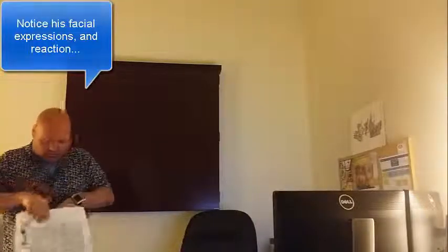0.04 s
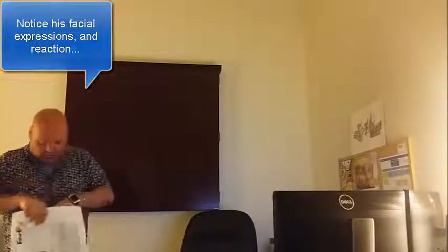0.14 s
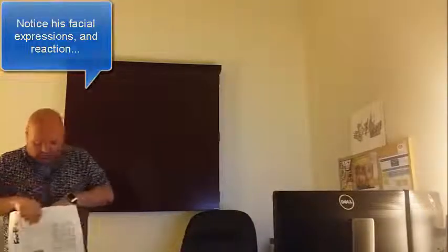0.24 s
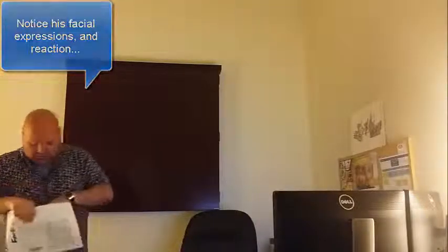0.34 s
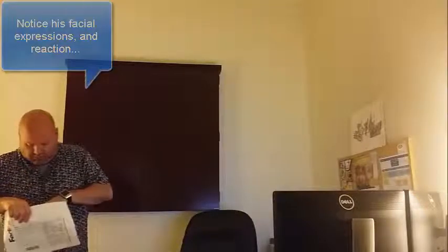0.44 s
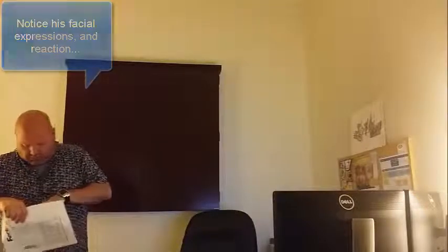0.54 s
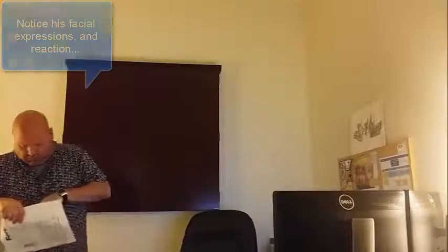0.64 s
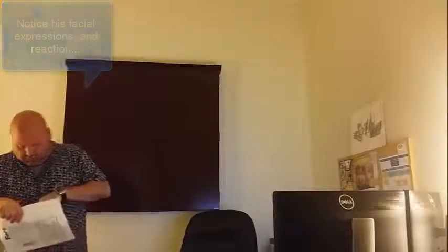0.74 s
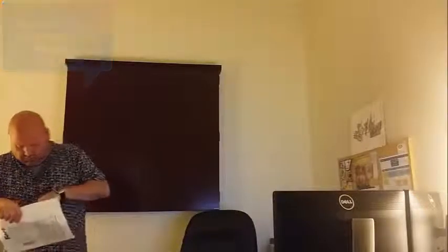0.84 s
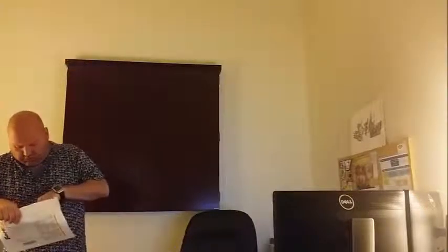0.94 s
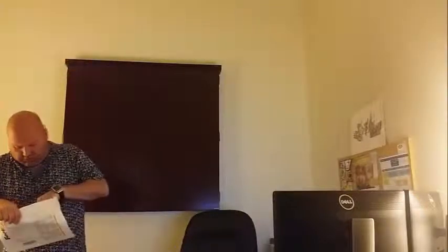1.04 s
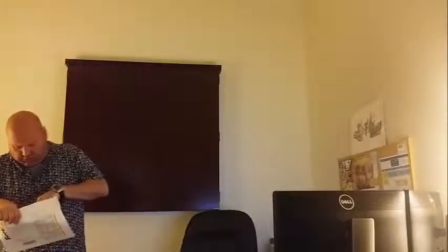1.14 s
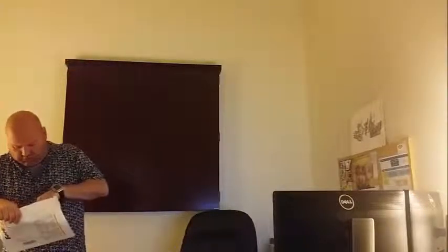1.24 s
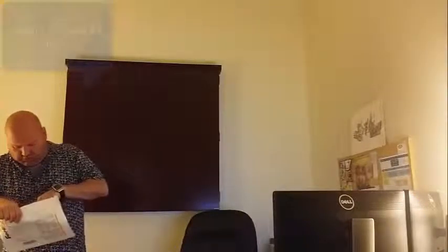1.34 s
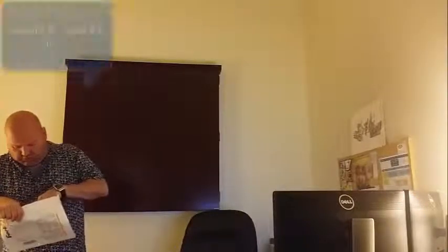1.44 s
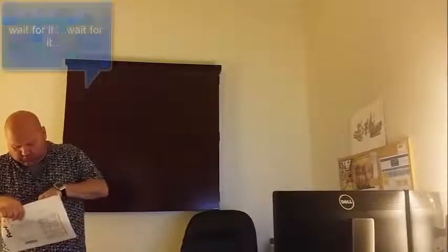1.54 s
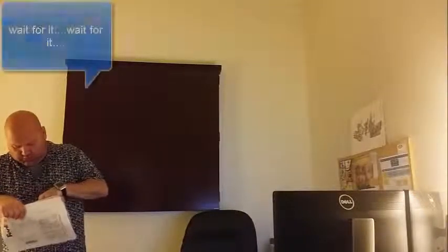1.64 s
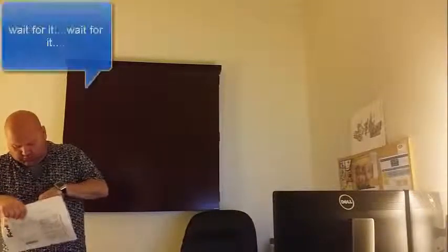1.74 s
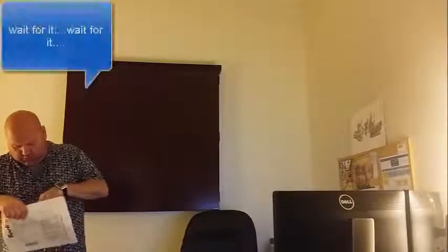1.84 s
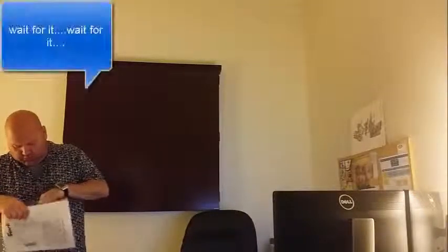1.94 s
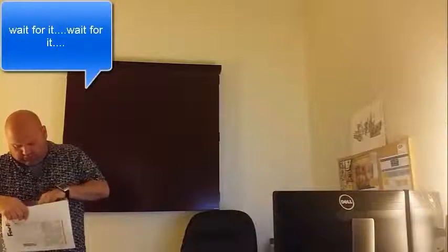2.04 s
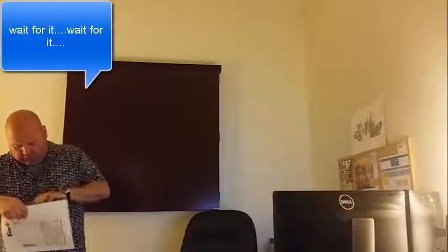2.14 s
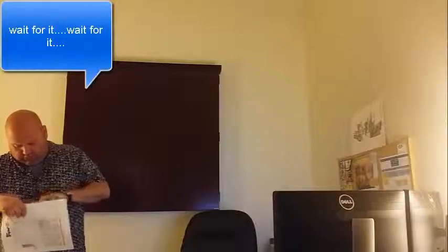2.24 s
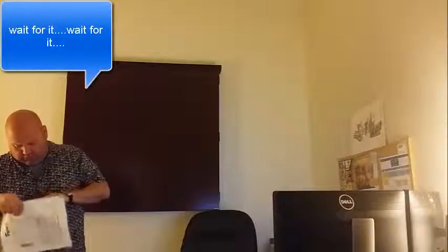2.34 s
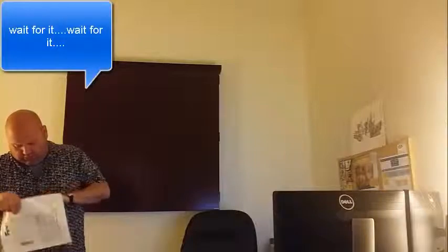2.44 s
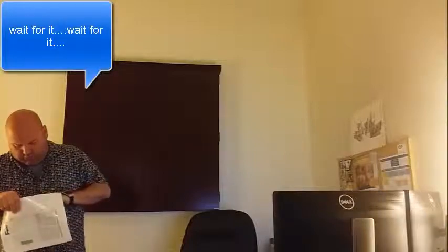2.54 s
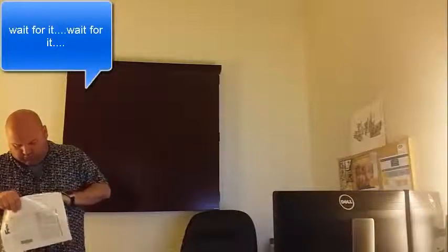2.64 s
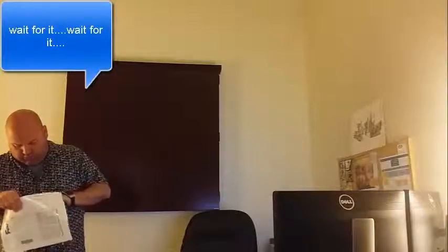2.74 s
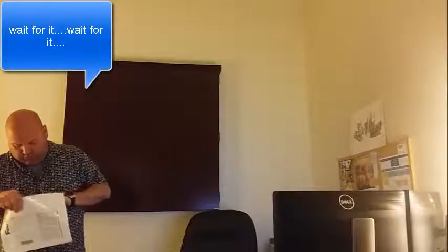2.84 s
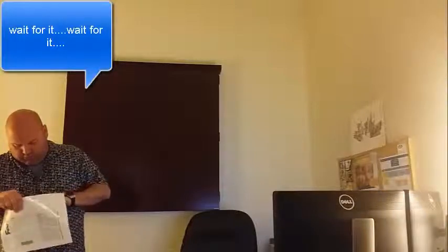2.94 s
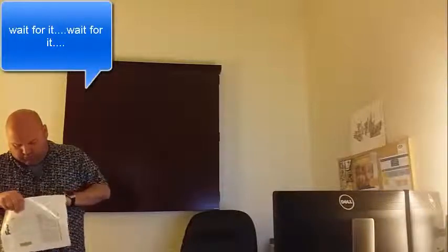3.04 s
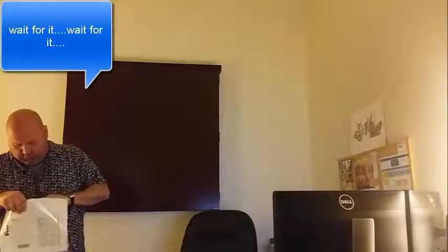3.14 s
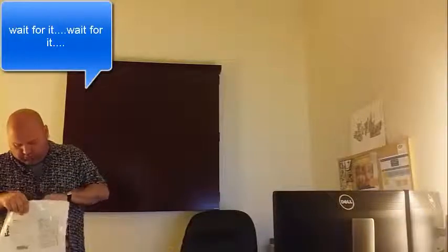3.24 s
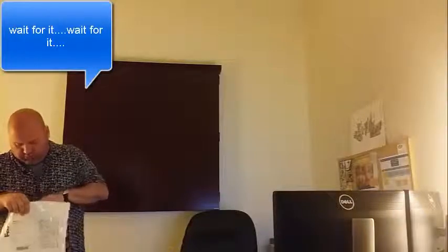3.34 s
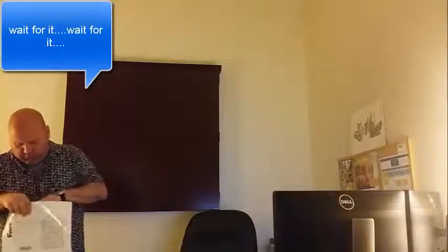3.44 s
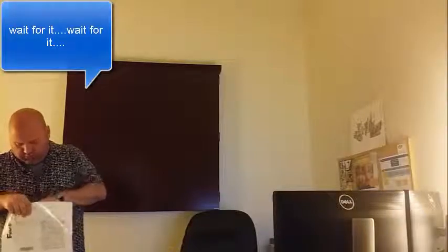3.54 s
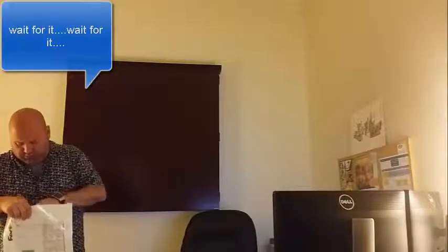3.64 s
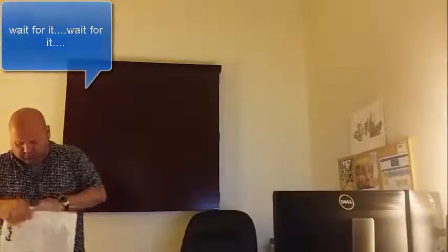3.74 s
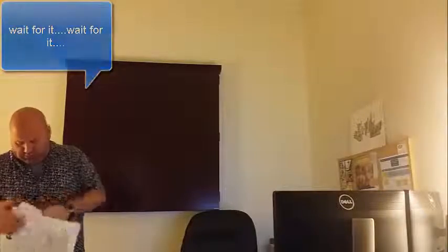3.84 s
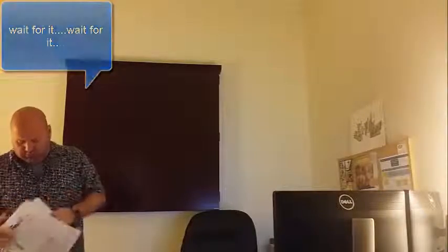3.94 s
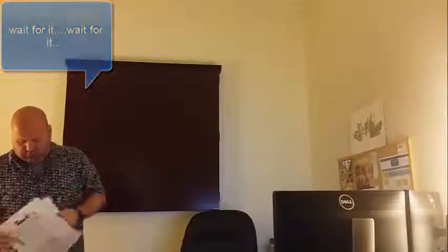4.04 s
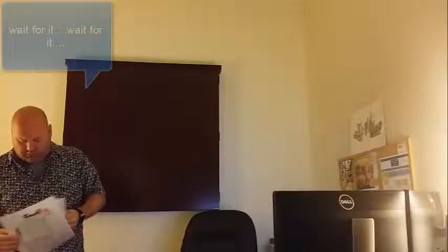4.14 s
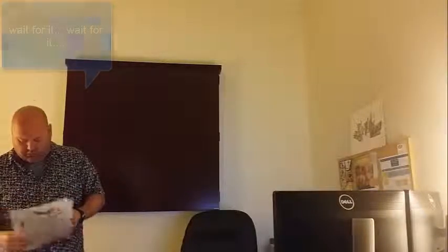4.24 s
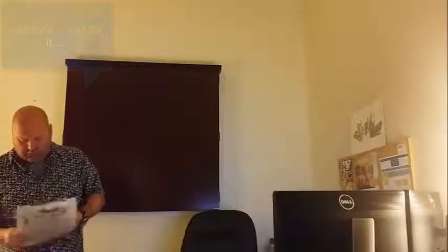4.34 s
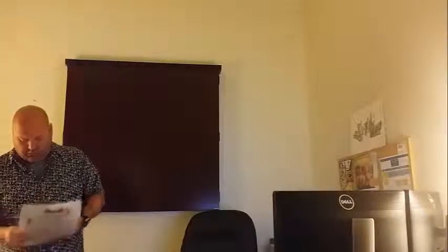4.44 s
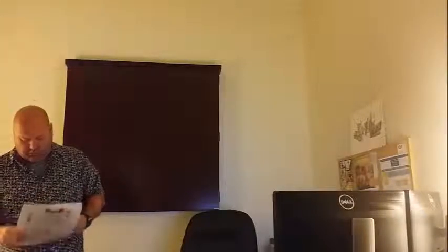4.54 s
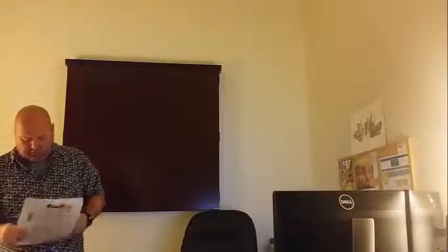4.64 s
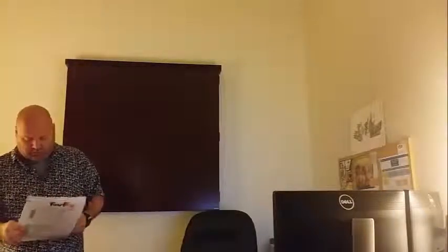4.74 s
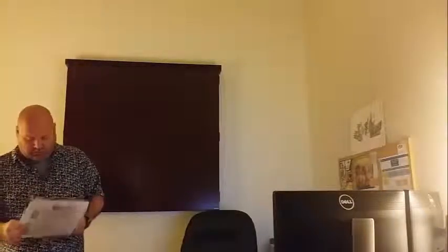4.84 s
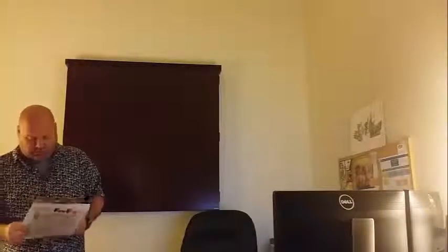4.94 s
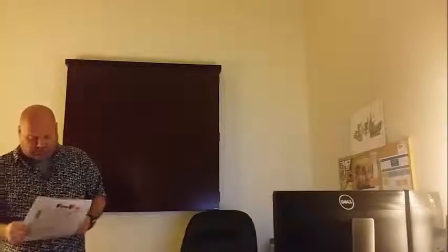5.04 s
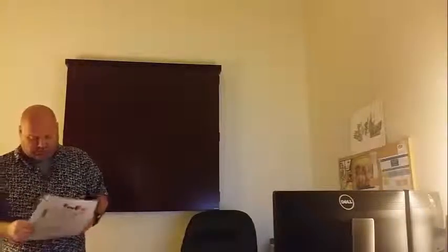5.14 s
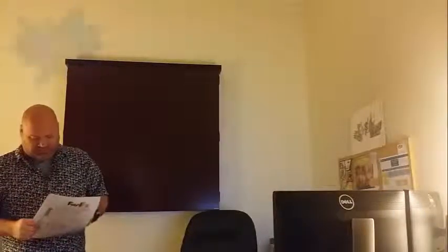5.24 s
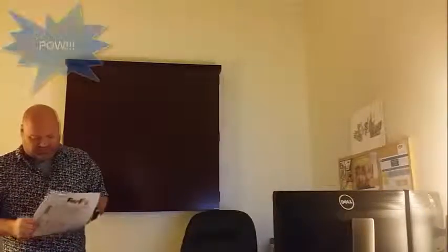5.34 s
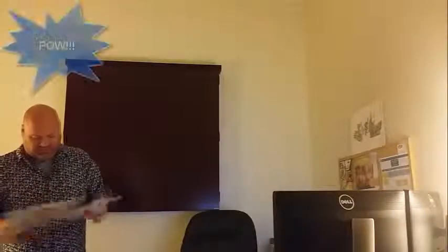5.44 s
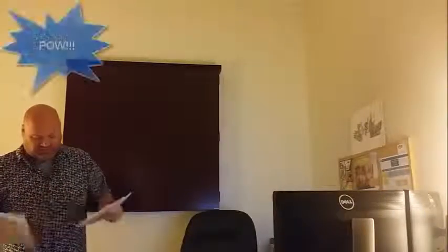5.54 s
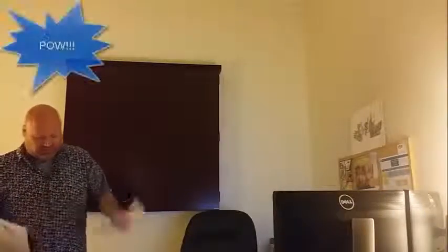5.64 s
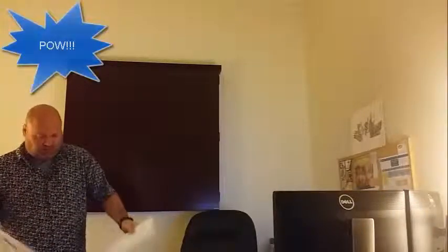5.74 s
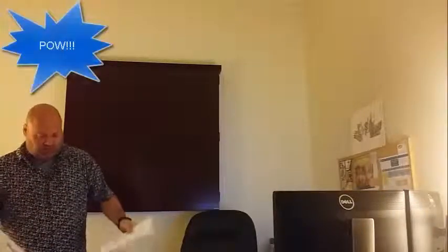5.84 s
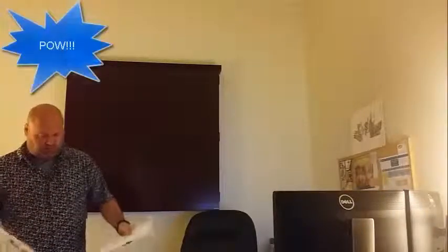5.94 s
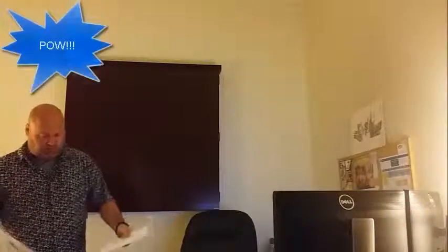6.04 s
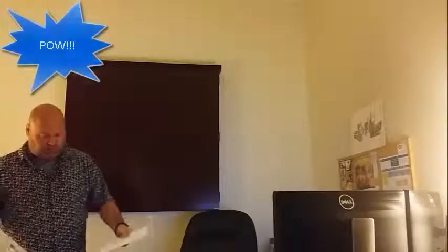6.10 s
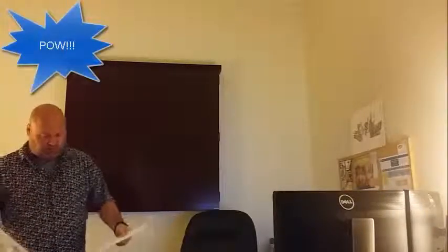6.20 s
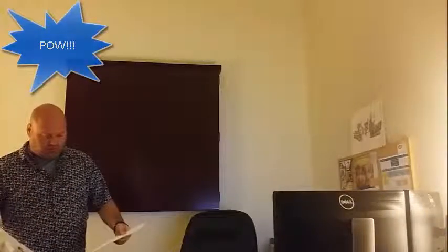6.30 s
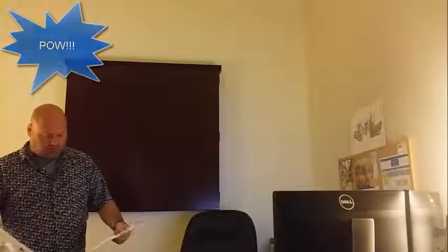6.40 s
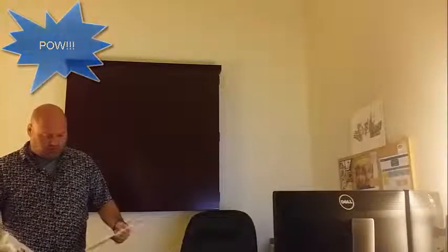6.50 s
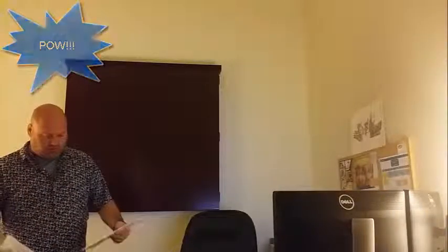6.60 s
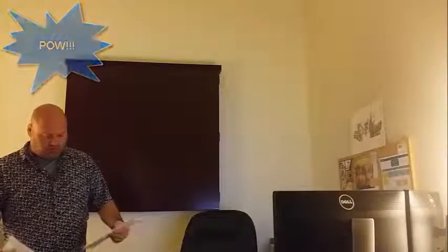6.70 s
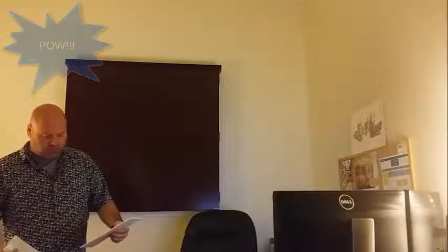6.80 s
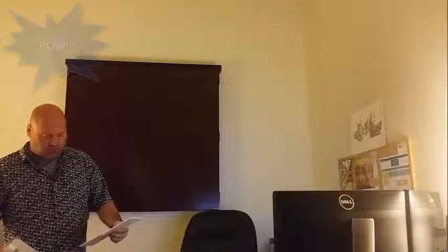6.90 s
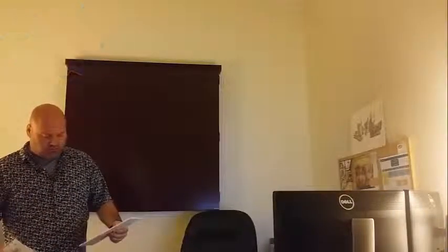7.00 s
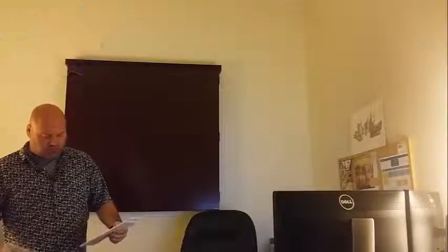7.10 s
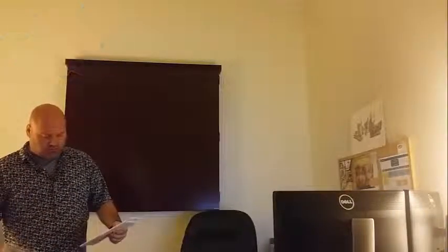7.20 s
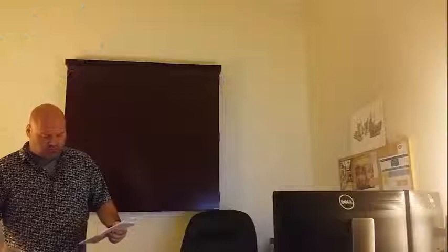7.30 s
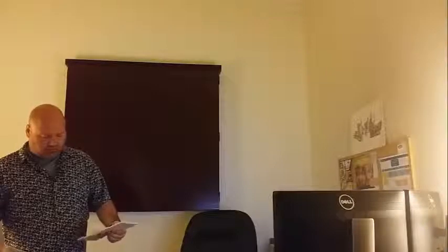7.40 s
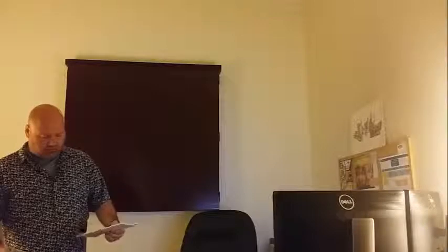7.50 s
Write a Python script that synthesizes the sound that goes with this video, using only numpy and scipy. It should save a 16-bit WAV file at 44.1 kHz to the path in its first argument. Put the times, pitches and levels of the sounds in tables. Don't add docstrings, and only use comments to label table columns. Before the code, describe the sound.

A small office with steady, low air-conditioning hum and faint hiss, heard by stereo microphones a few steps from the handling. At 0 to 0.3 s a stiff card envelope flaps and knocks, then fades to faint rustles, with a light tick near 0.8 and a soft thump near 1.0. A short burst of bending and scraping comes at 2.0 to 2.5. From 3.1 the envelope is worked open: crinkles, snaps and dry scrapes, densest from 3.8 to 4.7, with a sharp tick at 4.75 and a brighter crack at 4.8. More rustling leads to 5.5, when a popper explodes: hard overloaded crack, low boom, bright room and panel ringing fading over about half a second. The shell ticks twice around 5.85. The hum is ducked very low, then swells back from about 6.2 to 7.5, with barely audible paper movement.

```python
import sys
import numpy as np
from scipy import signal
from scipy.fft import rfft, irfft, next_fast_len
from scipy.io import wavfile
from scipy.ndimage import uniform_filter1d, map_coordinates

SR = 44100
rng = np.random.default_rng(int(sys.argv[2]) if len(sys.argv) > 2 else 0)


def makeup_ratio(level_db):
    decades = np.asarray(level_db, float) / 20
    return 10 ** decades


def wav_record(signal):
    frames = np.transpose(np.atleast_2d(signal))
    bounded = np.clip(frames, -1, 1)
    quanta = np.round(bounded * 32767).astype(np.int16)
    wavfile.write(sys.argv[1], SR, quanta)


N = 333528

# (frequency [Hz], density [dB per Hz])
AIR_SPECTRUM = [(15, -60.5), (25, -35), (41, -20), (76, -13), (99, -5.5), (153, -0.5), (236, -9),
                (384, -27), (695, -27.5), (887, -18.5), (1100, -17.5), (4610, -43.5), (11900, -48.5),
                (14400, -51), (16000, -86.5)]
# (frequency [Hz], correlation [-1..1])
AIR_LIKENESS = [(60, 0.78), (150, 1), (380, 0.79), (950, 0.15), (2380, 0.42), (5980, -0.0), (15000, 0.066)]
# (frequency [Hz], left over right [dB])
AIR_BALANCE = [(60, -1.5), (240, -4), (950, -2.0), (3770, -1.5), (15000, -1)]
# (frequency [Hz], t60 [s])
ROOM_T60 = [(60, .2), (200, 0.18), (700, .38), (2000, 0.46), (4450, 0.47), (9000, 0.47), (12000, 0.34),
            (15500, 0.33)]

# (time [s], hold
# [s], slide [dB], bend [dB], wave over bend [dB])
HAND_MOVES = [(0.036, 0.0089, -47, -43.5, -1), (0.06, .04, -58, -44, -4.5), (.11, 0.03, -72, -51, -1),
              (0.18, 0.083, -56.5, -57, -3.5), (0.29, 0.095, -64.5, -57, -5),
              (0.4, 0.37, -72.5, -61.5, -3.5), (0.465, .005, -62, -70, -5), (0.69, 0.0045, -66, -70, -5),
              (0.84, .005, -67, -68, -2), (1.024, 0.0072, -60, -60, 7), (1.3, 0.67, -77, -69, -3),
              (1.955, 0.025, -60, -55.5, 4.5), (1.99, .06, -54, -51, -4), (2.066, 0.013, -54, -45, -23),
              (2.385, 0.04, -54, -48, -7), (2.398, 0.01, -56.5, -40, -11.5),
              (2.462, 0.016, -67, -43.5, -5), (6.85, .5, -79, -80, -5), (7.524, 0.037, -66.5, -79.5, -5),
              (3.138, 0.083, -64.5, -63, -3), (3.24, 0.026, -69, -53, -2),
                 (3.324, 0.037, -64.5, -58, -11), (3.421, .005, -75, -48.5, -11),
                 (3.475, 0.033, -58, -55, -7), (3.513, 0.23, -58, -54.5, -6),
                 (3.774, 0.032, -45, -49.5, -9), (3.818, 0.059, -54.5, -45, -4),
                 (3.932, 0.08, -66, -65, 4.5), (4.062, 0.14, -62.5, -60.5, -12),
                 (4.243, 0.033, -56.5, -52, -13), (4.304, .005, -54, -42, -20),
                 (4.344, 0.081, -53.5, -54.5, -10), (4.45, 0.013, -48, -54, -5),
                 (4.469, 0.083, -53, -52, -1.5), (4.583, 0.061, -47.5, -51.5, -11),
                 (4.666, 0.018, -56, -48, -8), (4.885, 0.13, -76, -55.5, -9), (5.13, 0.13, -59.5, -60, -4),
                 (5.25, 0.077, -51, -48.5, -7.5), (5.34, 0.017, -47.5, -46, -12),
                 (5.392, 0.044, -62.5, -54, -10), (5.475, 0.017, -49, -56, -9)]
# (frequency [Hz], density [dB per Hz])
CRINKLE_SPECTRUM = [(3000, -33.5), (4600, -3.5), (6000, -5), (8700, 3.5), (11500, -11.5), (13000, -6),
                    (14500, -9.5), (15100, -32.5), (16500, -71)]
# (frequency [Hz], density [dB per Hz])
FLAP_SPECTRUM = [(450, -44.5), (780, -4), (950, 4), (1500, 0), (2100, -4.5), (3300, -35)]
# (frequency [Hz], density [dB per Hz])
SCRAPE_SPECTRUM = [(1400, -36), (2300, 0.5), (3200, -1), (4400, -7.5), (6500, -34)]
# (frequency [Hz], density [dB per Hz])
WAVE_SPECTRUM = [(120, -40.5), (280, -7), (500, -0.5), (750, -4), (1300, -35.5)]

# (time [s], crack [dB], knock [dB], thump [dB], left over right [dB])
FOLD_SNAPS = [(0.033, -32, -28.5, -44, -14), (0.8335, -48, -65, -69, -9), (1.04, -62, -53, -43, -5),
              (2.0717, -41, -32, -43, -8), (2.394, -32.5, -50, -48, -1), (2.4605, -47, -33.5, -39, -10),
              (3.2433, -52, -41.5, -45.5, -8), (3.4042, -65, -70, -34, -6), (3.814, -36.5, -59, -35, -4),
              (3.865, -35.5, -42, -51, -1.5), (4.278, -41, -42, -56, -8), (4.3051, -36, -59, -62, -6),
              (4.4694, -40, -31.5, -37, -4), (4.7972, -17.5, -61, -43, -6.5), (5.0994, -56, -59, -64, -4),
              (5.4694, -43, -52, -56, 1)]
# (time [s], crack [dB], knock [dB], thump [dB], left over right [dB])
SHELL_TICKS = [
    (4.739, -29.5, -53, -51, -2),
    (5.832, -34, -39.5, -57, 2.5),
    (5.853, -43.5, -46, -51, -1),
]
# (frequency [Hz], density [dB per Hz])
BRIGHT_CRACK_SPECTRUM = [(410, -53.5), (800, -20.5), (1100, 0.5), (1800, -3), (2800, -7), (4000, -7),
                         (5500, -11), (8000, -7), (10500, -18), (14500, -22.5), (16500, -28.5)]
# (frequency [Hz], density [dB per Hz])
DULL_CRACK_SPECTRUM = [(500, -43), (900, -1), (1500, 3), (3000, -9.5), (5000, -13), (7000, -23),
                       (12000, -38)]
# (frequency [Hz], density [dB per Hz])
KNOCK_SPECTRUM = [(300, -41.5), (700, -10), (1000, 2.5), (1500, -13), (2500, -14.5), (5000, -42)]
# (frequency [Hz], density [dB per Hz])
THUMP_SPECTRUM = [(60, -36), (130, 3), (300, 2), (600, -17), (1000, -25.5), (2500, -50.5)]

# (time [s], peak [dB])
BANGS = [
    (5.511, 9),
]
# (frequency [Hz], density [dB per Hz])
FRONT_SPECTRUM = [(180, -29.5), (300, -3.5), (1070, -14), (1630, 0), (2210, -14.5), (2520, -0.5),
                  (3410, -12.5), (4100, 3), (6790, -4.5), (14200, -21), (16500, -46)]
# (frequency [Hz], density [dB per Hz])
BOOM_SPECTRUM = [(25, -22.5), (70, -3.5), (170, 1.5), (350, -11), (520, -3), (900, -27.5), (2500, -60.5)]
# (frequency [Hz], density [dB per Hz])
BLAST_SPECTRUM = [(24, -55.5), (40, -17), (75, -26), (228, -12), (564, -13), (1260, -2), (1400, -3),
                  (1890, -3), (2090, -6.5), (3730, -9), (4450, -5.5), (5590, -11.5), (7010, -8),
                  (14900, -22.5), (16500, -52)]
# (frequency [Hz], width [Hz], level [dB], t60 [s])
PANEL_BANDS = [(4430, 300, -25, 0.85), (4400, 260, -47, 1.5), (4900, 1000, -23.5, 0.79),
               (1600, 700, -20.5, 0.6), (7100, 600, -23.5, .55), (3290, 80, -31.5, .6)]
# (frequency [Hz], gain [dB])
MIC_RESPONSE = [(20, -1), (14600, -1), (15600, -8.5), (16300, -25), (17000, -70.5)]

LEAD_SAMPLES = 8
RISE_DB_PER_S, FALL_DB_PER_S = 650, 299
GRAB_DB, GRAB_S = 2.5, 0.042
DUCK_DB, DUCK_S, HOLD_S, RECOVER_S = 18.5, 0.36, 0.25, 0.64


def unit(x):
    return x / np.sqrt(np.mean(x ** 2) + 1e-20)


def along(points, hz):
    point_hz, value = np.transpose(points)
    return np.interp(np.log(hz + 1), np.log(point_hz + 1), value)


def wobble(knots_per_s):
    knots = rng.standard_normal(int(N * knots_per_s / SR) + 4)
    return map_coordinates(knots, [np.arange(N) * knots_per_s / SR])


def filtered(x, response):
    length = x.shape[-1]
    size = next_fast_len(length + 8192)
    gain = response(np.fft.rfftfreq(size, 1 / SR))
    return irfft(rfft(x, size) * gain, size)[..., :length]


def kernel(spectrum, size=4096):
    gain = makeup_ratio(along(spectrum, np.fft.rfftfreq(size, 1 / SR)))
    cepstrum = irfft(np.log(gain + 1e-6), size)
    fold = np.r_[1, np.full(size // 2 - 1, 2), 1, np.zeros(size // 2 - 1)]
    h = irfft(np.exp(rfft(cepstrum * fold)), size)
    return h / np.linalg.norm(h)


def tail(stretch=1, patchy_db=0):
    hz, t, z = signal.stft(rng.standard_normal((2, SR)), SR, nperseg=256)
    patches = uniform_filter1d(rng.standard_normal(z.shape), size=5, axis=1)
    patches = uniform_filter1d(patches, size=3, axis=2)
    decay_db = -60 * t / (stretch * along(ROOM_T60, hz)[:, None])
    h = signal.istft(z * makeup_ratio(decay_db + patchy_db * unit(patches)), SR, nperseg=256)[1][:, :SR]
    return h / np.linalg.norm(h[0])


def air():
    z = signal.stft(rng.standard_normal((2, N)), nperseg=512)[2]
    patches = uniform_filter1d(rng.standard_normal(z.shape[1:]), size=6, axis=0)
    patches = uniform_filter1d(patches, size=14, axis=1)
    pair = signal.istft(z * makeup_ratio(0.46 * unit(patches)), nperseg=512)[1][:, :N]

    def mid_side_gain(hz):
        angle = np.arccos(np.clip(along(AIR_LIKENESS, hz), -1, 1)) / 2
        return makeup_ratio(along(AIR_SPECTRUM, hz)) * [np.cos(angle), np.sin(angle)]

    def balance_gain(hz):
        return makeup_ratio(along(AIR_BALANCE, hz) * np.array([[.5], [-.5]]))

    mid, side = filtered(pair, mid_side_gain)
    left_right = filtered(np.array([mid + side, mid - side]), balance_gain)
    level_db = -43.5 + 0.22 * wobble(4.2)
    return makeup_ratio(level_db) * unit(left_right)


def hand_moves(moves):
    t = np.arange(0, N, 32) / SR
    power = 0
    for start_s, hold_s, slide_db, bend_db, wave_db in moves:
        rise_db = -RISE_DB_PER_S * np.maximum(start_s - t, 0)
        fall_db = -FALL_DB_PER_S * np.maximum(t - start_s - hold_s, 0)
        levels_db = np.c_[[slide_db, bend_db, (slide_db + bend_db) / 2, bend_db + wave_db]]
        power = power + makeup_ratio(2 * (rise_db + fall_db + levels_db))
    return [np.interp(np.arange(N) / SR, t, np.sqrt(p)) for p in power]


def creases(spectrum, spread_db, clump_db):
    size = makeup_ratio(spread_db * rng.exponential(size=N) + clump_db * wobble(70))
    return unit(signal.fftconvolve(size * rng.standard_normal(N), kernel(spectrum))[:N])


def paper():
    slide, bend, both, wave = hand_moves(HAND_MOVES)
    near = slide * creases(CRINKLE_SPECTRUM, spread_db=2, clump_db=1.4)
    near = near + bend * creases(FLAP_SPECTRUM, spread_db=2, clump_db=2.5)
    near = near + both * makeup_ratio(-1.5) * creases(SCRAPE_SPECTRUM, spread_db=2, clump_db=2.5)
    near = near + wave * creases(WAVE_SPECTRUM, spread_db=1.2, clump_db=2)
    phase = 2 * np.pi * 7 * np.arange(N) / SR + 2 * wobble(9)
    walls = np.zeros((2, N))
    for share in (np.cos(phase), np.sin(phase)):
        wall = tail(.24)[:, :SR // 4]
        walls += signal.fftconvolve((near * share)[None], wall, axes=1)[:, :N]
    direct = np.array([near, np.roll(near, LEAD_SAMPLES)])
    return direct * makeup_ratio([[-5], [-2]]) + makeup_ratio([[-4], [-2.5]]) * walls


def snaps():
    out = np.zeros((2, N + 2 * SR))
    knock, thump = kernel(KNOCK_SPECTRUM), kernel(THUMP_SPECTRUM)
    bright, dull = kernel(BRIGHT_CRACK_SPECTRUM), kernel(DULL_CRACK_SPECTRUM)
    events = [(bright, e) for e in FOLD_SNAPS] + [(dull, e) for e in SHELL_TICKS]
    for crack, (time_s, crack_db, knock_db, thump_db, pan_db) in events:
        start = round(time_s * SR)
        hit = makeup_ratio(crack_db + 4.5) * crack + makeup_ratio(knock_db + 6.0) * knock + makeup_ratio(thump_db + 11.5) * thump
        side = makeup_ratio([[pan_db / 2], [-pan_db / 2]])
        out[:, start:][:, :len(hit)] += hit * side
        desk, room = tail(.2), tail(0.8)
        echo = signal.fftconvolve(hit[None], makeup_ratio(10.5) * desk + makeup_ratio(10) * room, axes=1)
        out[:, start + 40:][:, :echo.shape[1]] += echo * np.sqrt(side)
    out[1] = np.roll(out[1], LEAD_SAMPLES)
    return out[:, :N]


def panels():
    t = np.arange(SR) / SR
    out = np.zeros((2, SR))
    for hz, width_hz, level_db, t60_s in PANEL_BANDS:
        noise = rng.standard_normal((2, SR))
        band = unit(filtered(noise, lambda f: 1 / (1 + (2 * (f - hz) / width_hz) ** 4)))
        out += makeup_ratio(level_db - 60 * t / t60_s) * band
    return out


def shock_front(t):
    u = t / 0.00033
    puff = 0.52 * rng.standard_normal((2, len(t))) * makeup_ratio(-60 * t / 0.045)
    return signal.fftconvolve((1 - u) * np.exp(-u) + puff, kernel(FRONT_SPECTRUM)[None], axes=1)


def envelope_boom(t):
    gust = rng.standard_normal((3, len(t))) * makeup_ratio(-60 * t / 0.11) * (1 - np.exp(-t / 0.006))
    left_right = gust[0] + .7 * gust[1:]
    return makeup_ratio(-8.5) * signal.fftconvolve(left_right, kernel(BOOM_SPECTRUM)[None], axes=1)


def room_ring():
    room = makeup_ratio(26.0) * tail(patchy_db=3.5)
    corridor = makeup_ratio(13) * filtered(tail(2.0), lambda hz: 1 / (1 + (hz / 11500) ** 4))
    return signal.fftconvolve(room + corridor, kernel(BLAST_SPECTRUM)[None], axes=1)


def popper():
    out = np.zeros((2, N + 2 * SR))
    t = np.arange(SR // 8) / SR
    for time_s, peak_db in BANGS:
        for part in (shock_front(t), envelope_boom(t), room_ring(), panels()):
            out[:, round(time_s * SR):][:, :part.shape[1]] += makeup_ratio(peak_db - 9.5) * part
    out[1] = np.roll(out[1], LEAD_SAMPLES)
    return out[:, :N] * makeup_ratio([[-.8], [.8]])


def scene():
    return air() + paper() + snaps() + popper()


def gain_control():
    since_s = np.maximum(np.arange(N) / SR - BANGS[0][0], 0)
    grab_db = GRAB_DB * np.minimum(since_s / GRAB_S, 1)
    sink_db = (DUCK_DB - GRAB_DB) * np.minimum(since_s / DUCK_S, 1) ** 1.2
    recovering_s = np.maximum(since_s - DUCK_S - HOLD_S, 0)
    return makeup_ratio(-(grab_db + sink_db) * np.exp(-(recovering_s / RECOVER_S) ** 2))


def roll_off(x):
    return signal.sosfilt(signal.butter(12, 16660, fs=SR, output="sos"), x)


def record(dry):
    ceiling, knee = .58, 5
    clipped = dry / (1 + np.abs(dry / ceiling) ** knee) ** (1 / knee)
    rolled_off = filtered(clipped, lambda hz: makeup_ratio(along(MIC_RESPONSE, hz)))
    return roll_off(rolled_off * gain_control())


dry = scene()
out = record(dry)
wav_record(out)
```